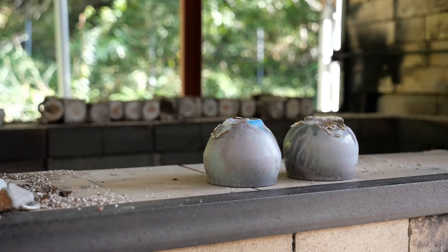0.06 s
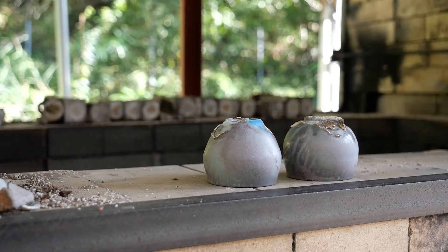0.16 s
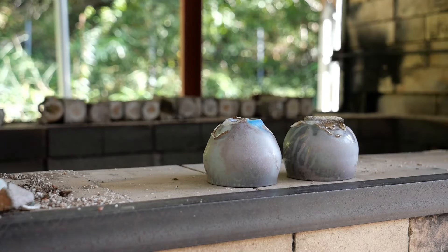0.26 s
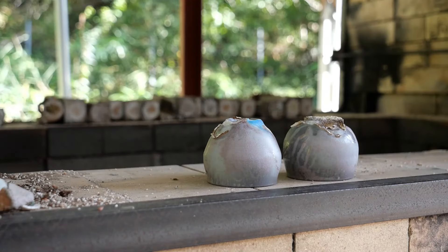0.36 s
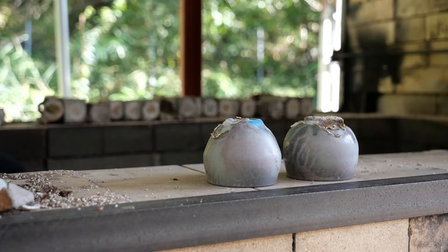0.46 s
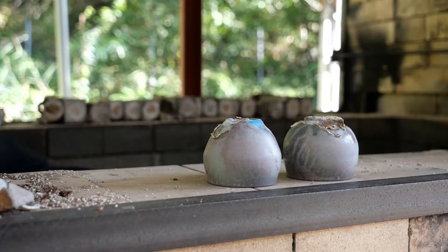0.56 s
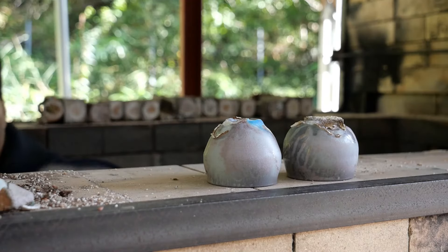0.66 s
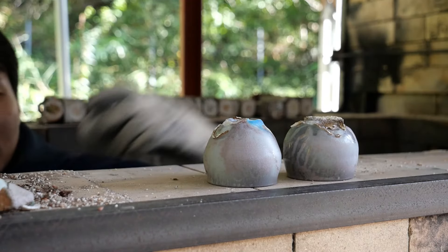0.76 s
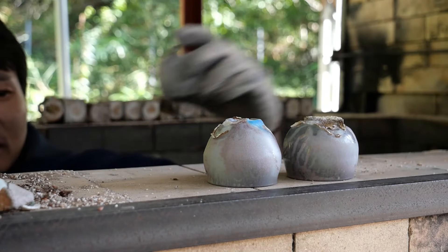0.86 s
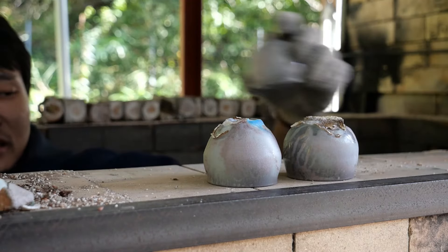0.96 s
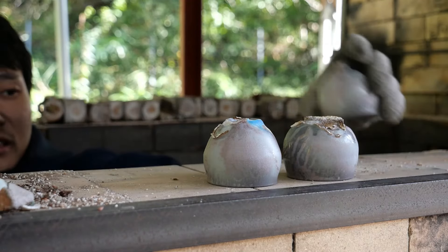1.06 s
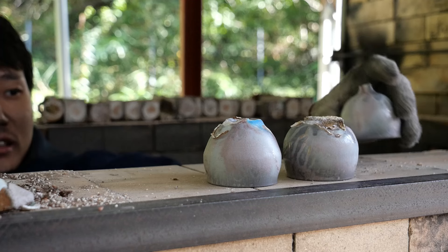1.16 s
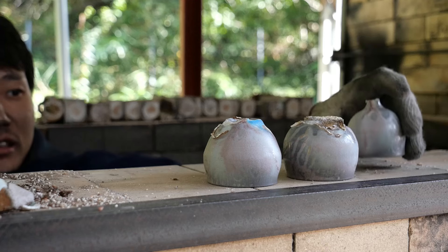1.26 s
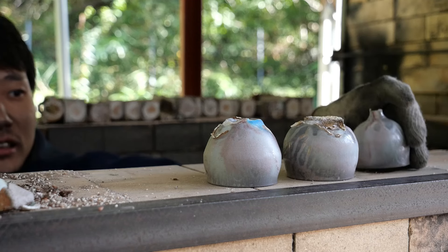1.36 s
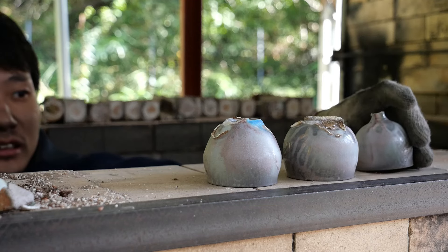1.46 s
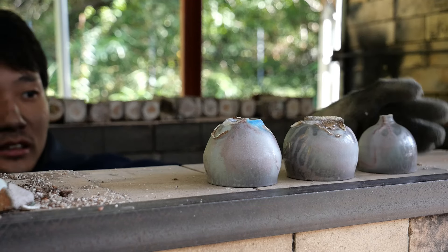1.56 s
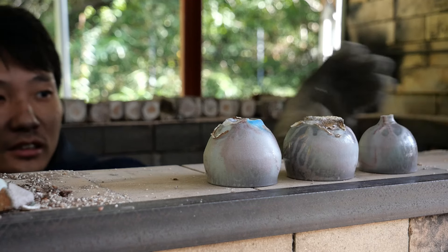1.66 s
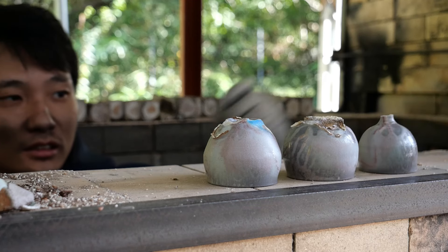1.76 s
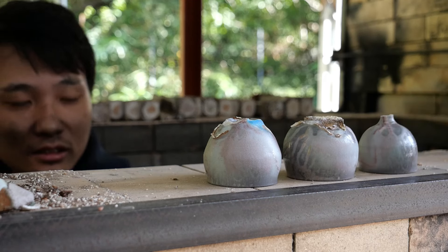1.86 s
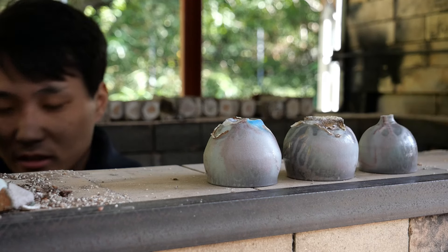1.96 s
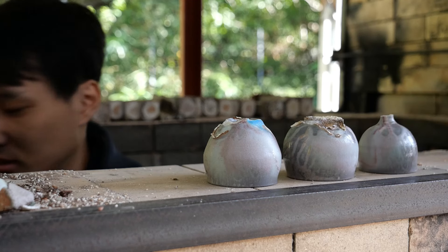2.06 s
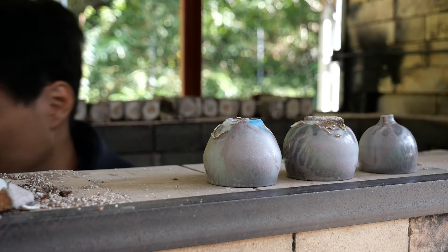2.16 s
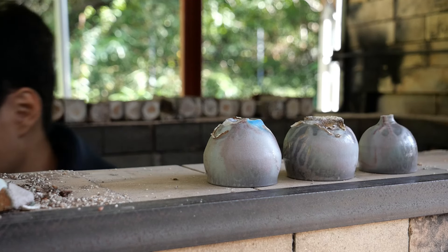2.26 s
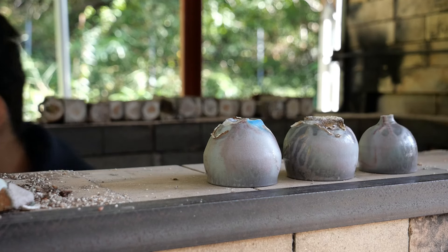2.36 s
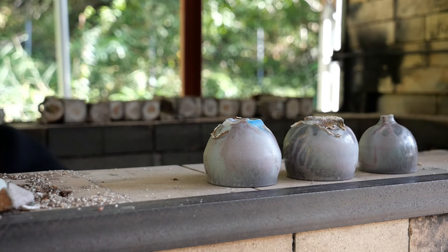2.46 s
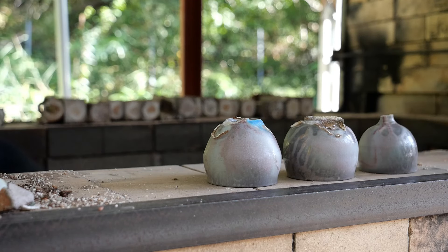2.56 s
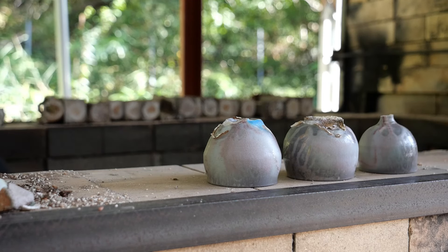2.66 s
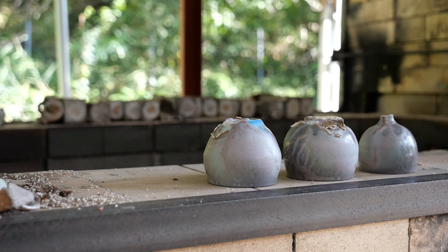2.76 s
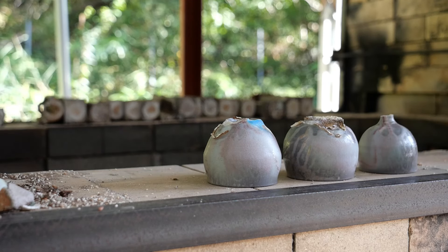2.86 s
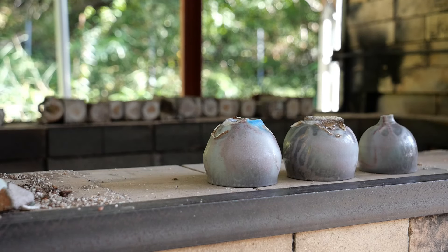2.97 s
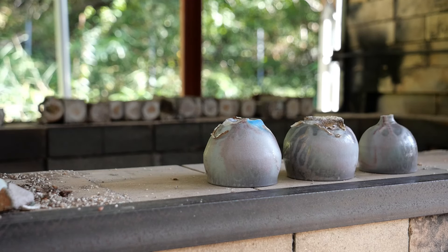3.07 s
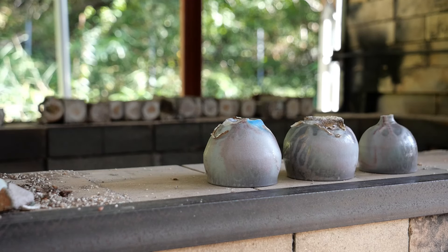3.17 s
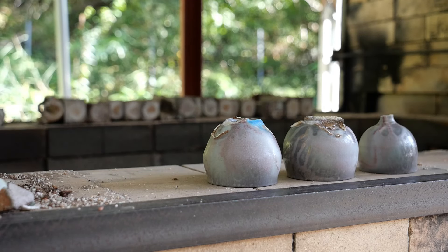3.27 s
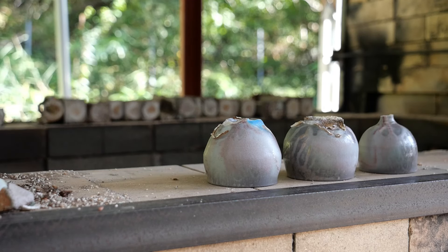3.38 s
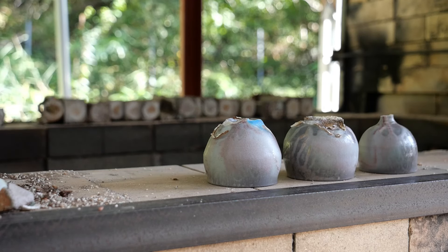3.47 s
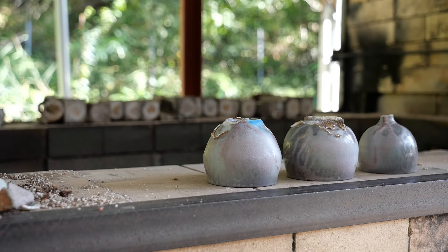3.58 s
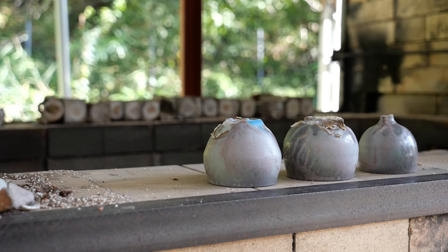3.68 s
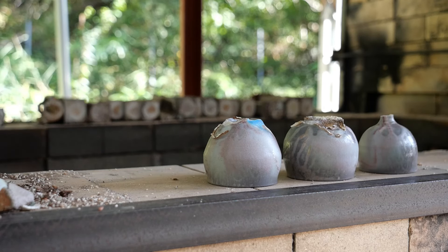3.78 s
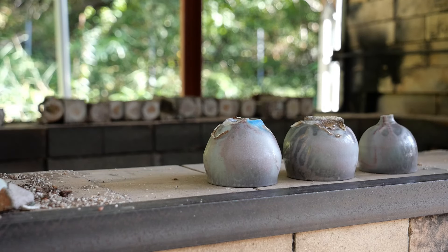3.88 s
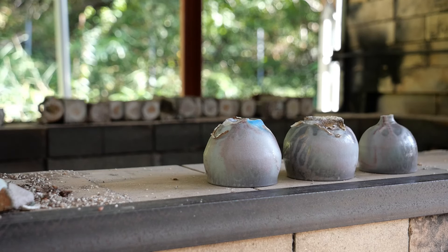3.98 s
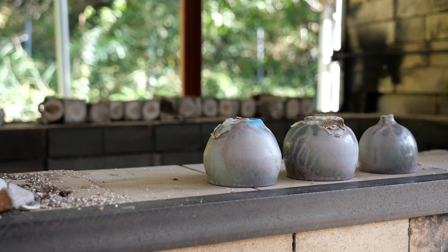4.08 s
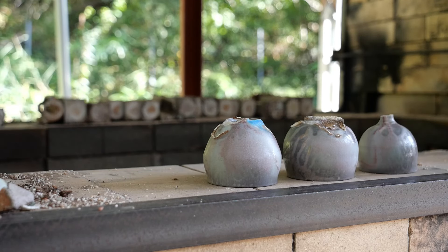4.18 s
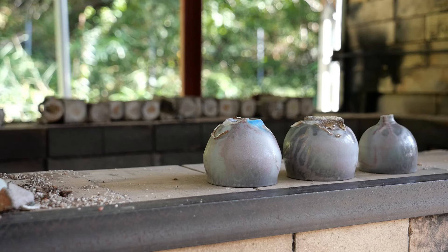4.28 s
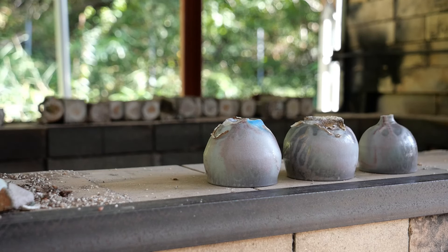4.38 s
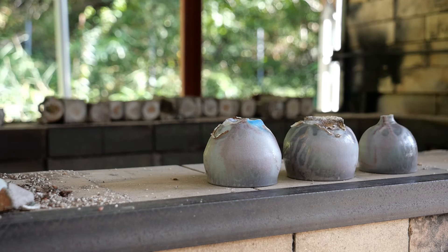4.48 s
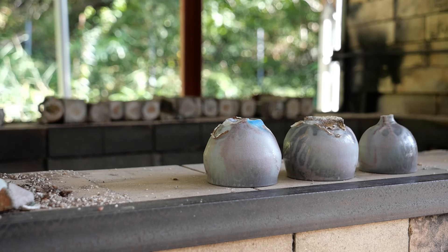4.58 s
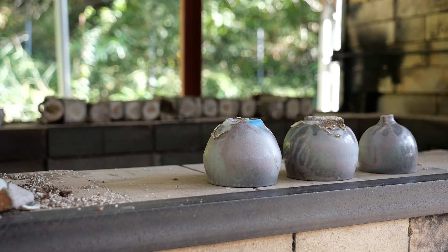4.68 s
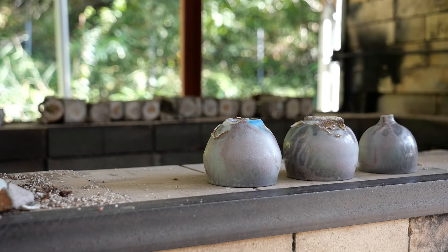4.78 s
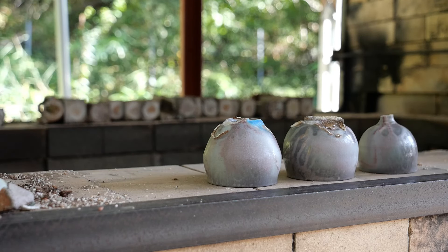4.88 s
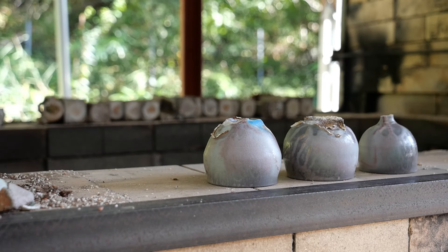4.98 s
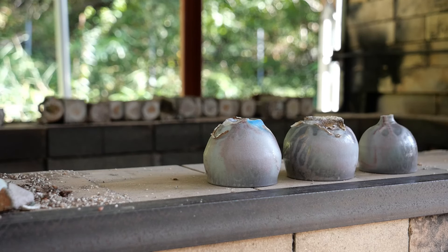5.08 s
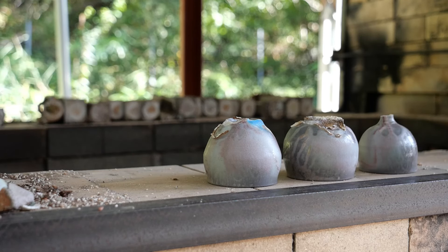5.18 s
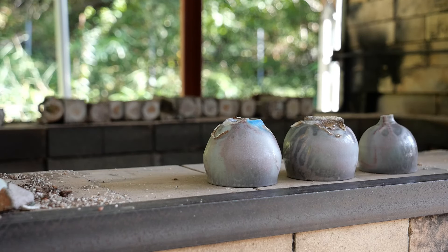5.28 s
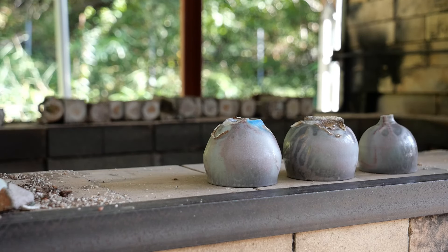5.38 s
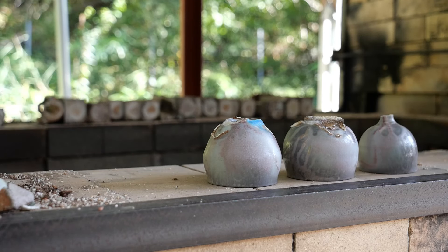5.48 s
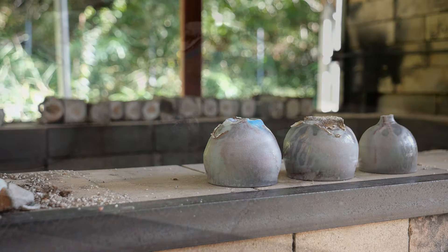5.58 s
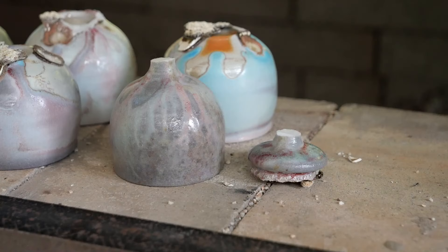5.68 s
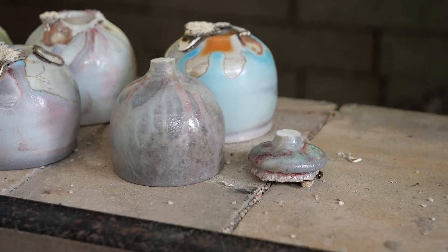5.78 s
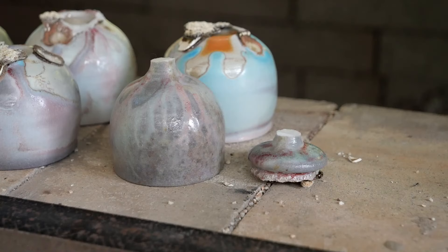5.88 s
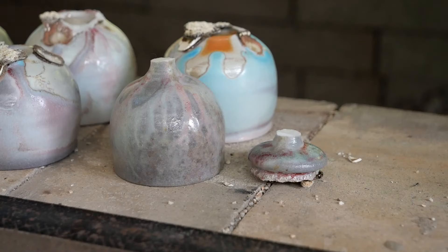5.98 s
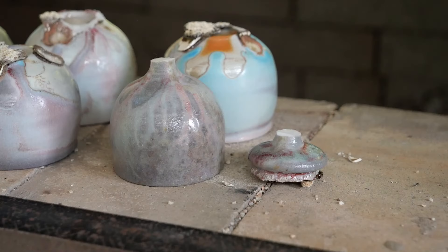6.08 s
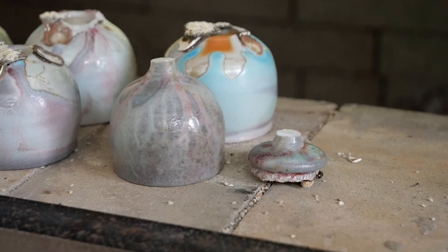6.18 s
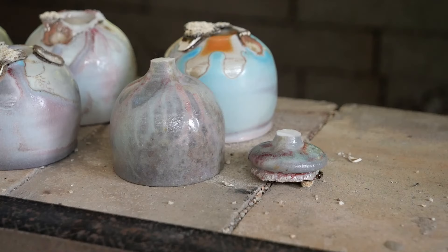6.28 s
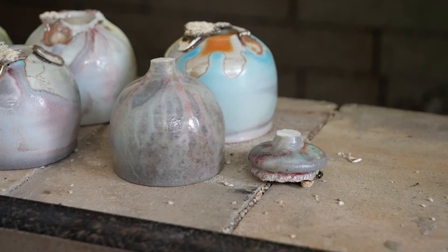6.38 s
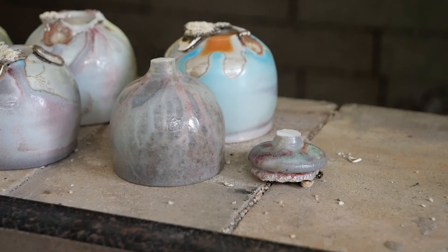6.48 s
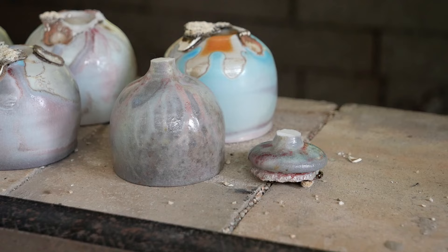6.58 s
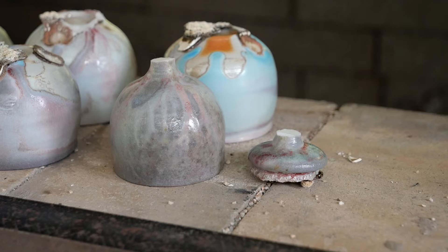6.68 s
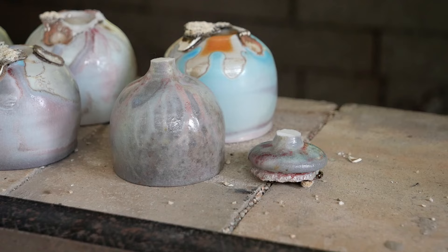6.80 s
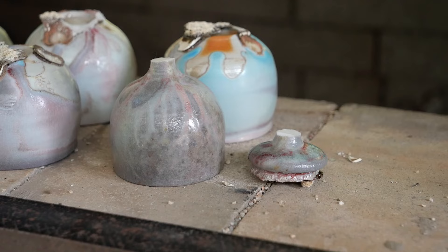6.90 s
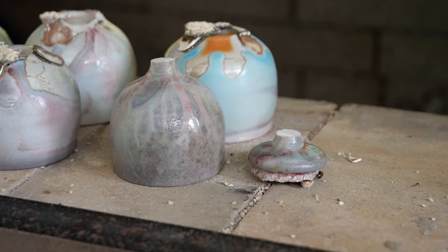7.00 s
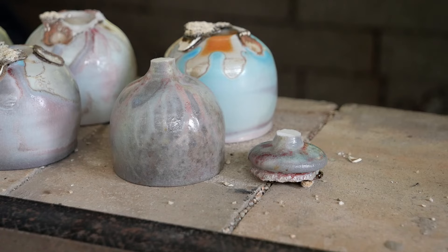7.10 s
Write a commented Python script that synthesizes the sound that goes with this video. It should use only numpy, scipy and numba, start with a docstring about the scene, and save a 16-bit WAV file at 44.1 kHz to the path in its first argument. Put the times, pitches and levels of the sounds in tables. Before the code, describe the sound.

In an open shed, low wind booms, flutters and thumps on the stereo microphone, mostly harder on the left, over faint leaf hiss and insect chirps. A ceramic pot is set down with a light rattle and firm knock. Fine glassy ticks and pings follow from cooling glaze, with small gritty scrapes. The scene then cuts to a sheltered corner where the wind almost disappears and sparse pings and chirps remain.

```python
"""An open shed, close by a kiln shelf of freshly fired glazed pots, two microphone ports in the wind.
From the start eddies buffet the ports as booms, flutter and thumps, mostly harder on the left; banded scrapes
make insects chirp outside over a filtered-noise hiss. At 1.5 s a pot is set down: noise knocks and decaying modes.
From 2.1 s the glaze ticks (noise bursts) and the pots ring (decaying sines). At 5.6 s the place becomes
a sheltered corner with far less wind, where ticks, rings and chirps go on."""
import sys
import numpy as np
from scipy import signal
from scipy.fft import rfft, irfft
from scipy.io import wavfile
from scipy.ndimage import uniform_filter1d
from numba import njit

SR = 44100
rng = np.random.default_rng(int(sys.argv[2]) if len(sys.argv) > 2 else 0)


def to_wav(sig):
    """Store sig (one row per channel, or 1-D mono) as 16-bit WAV at the path in sys.argv[1].

    Samples outside -1..1 are clipped; the rate is SR.
    """
    pcm = np.clip(np.atleast_2d(sig), -1, 1) * 32767
    pcm = np.round(pcm).astype(np.int16)
    wavfile.write(sys.argv[1], SR, pcm.T)  # frames by channels


def undo_db(level):
    """Turn decibels back into plain size, where 20 dB means ten times bigger."""
    steps = np.asarray(level, float) / 20
    return 10 ** steps


N = 314874
CUT_S = 5.635  # the place changes from the windy shed to the sheltered corner
LEAD_S = 0.006  # brief quieter noise before each snap of a crack or knock


# glaze cracks on the shelf: (time [s], crack level before trim [dB], ring level [dB],
# tilt to high modes [dB per family step], ring length before stretch [s])
PINGS = [(2.144, -44, -51.5, -19.5, .42), (2.2054, -42, -52, -19.5, 0.13), (2.2902, -39.5, -60, -12, 0.25),
         (3.2273, -44, -46.5, 0.5, 0.052), (3.3817, -50.5, -60.5, -1, 0.15), (3.5359, -43, -44.5, -3, 0.1),
         (3.5654, -51, -50, 11, 0.077), (3.5742, -40, -60.5, 4, 0.16), (4.0887, -57, -70, -1.5, .12),
         (4.3413, -24, -42, 20.5, 0.083), (4.6553, -20, -31, 1, 0.077), (4.7334, -39.5, -45, -1, 0.063),
         (4.7735, -41, -53.5, -9, 0.045), (4.9256, -71, -69, -17, .14), (4.9915, -43.5, -47, -1, 0.42),
         (5.0501, -36.5, -38.5, -1.5, 0.1), (5.066, -36, -34.5, -3, .054), (5.2474, -45, -54, 0, 0.52),
         (5.3511, -34.5, -42, 1, 0.13), (5.4854, -47, -58.5, 0, 0.12), (5.5256, -41.5, -65.5, 0, 0.052),
         (5.5373, -52, -38.5, -1, 0.13), (5.5942, -46, -40, 1, 0.058), (5.705, -48, -46.5, 5, 0.54),
         (5.7787, -44, -59, 11.5, 0.39), (5.8224, -37.5, -43.5, -4.5, 0.2),
         (6.0462, -42.5, -51.5, -14, 0.054), (6.0829, -26, -26.5, -2.5, .12),
         (7.002, -42, -62.5, -10, 0.075)]
# modes of the ringing pot: (frequency [Hz])
POT_HZ = [1642, 3303, 3558, 4058, 5943, 7247, 7914, 8978, 11903, 12163, 13800]
# the same modes: (family from 0 low to 2 high, relative level [dB], t60 [s])
POT = [(0, -21.5, 0.21), (0, -18, 0.37), (0, -3.5, 0.51), (0, -6, 0.78), (1, -2, 0.21), (1, -0.5, 0.82),
       (1.6, -11, 0.57), (1, -31.5, 1), (1.7, -33.5, 0.69), (1.5, -32, 0.69), (2, -40.5, 0.56)]


def glaze_pings():
    """Each crack of the glaze strikes the pot and leans toward its low or its high modes."""
    out = np.zeros((2, N))
    for s, crack_db, ring_db, tilt_db, length in PINGS:
        top_hz = 10200 + 176 * (crack_db + 21)  # weaker cracks are duller
        tick = crack(crack_db - 1, tick_t60=0.029, tail_t60=0.17, tail_db=-5.5, lead_db=-6.5, top_hz=top_hz)
        add(out, s - LEAD_S, tick)
        for hz, (family, db, t60) in zip(POT_HZ, POT):
            stretch = 1.4 if hz > 8500 else 1  # the highest modes are muffled later
            add(out, s, ring(hz, db + ring_db + tilt_db * (family - 1), t60, length * stretch))
    return out


# extra single rings, short or long, many starting with a crack:
# (time [s], frequency [Hz], level before trim [dB], length [s])
SINGLE_RINGS = [(2.144, 1640, -27, 0.12), (2.126, 7914, -42.5, 0.26), (2.132, 11903, -57.5, 0.26),
                (2.15, 5943, -50, 0.44), (2.197, 3305, -38, 1.07), (2.216, 4958, -49.5, 0.12),
                (2.207, 4058, -32, .4), (2.135, 8978, -71, .4), (3.228, 5943, -38.5, 0.076),
                (3.54, 8978, -58, 0.1), (3.54, 1720, -49, 0.11), (4.657, 5943, -25.5, 0.073),
                (4.657, 8978, -57, 0.14), (4.772, 4790, -45, 0.066), (5.35, 1642, -44, 0.066),
                (4.936, 5943, -42.5, 0.24), (5.058, 4070, -32, 0.096), (5.049, 1652, -46, .12),
                (5.351, 4040, -32.5, 0.044), (5.6, 1645, -38, 0.037), (5.638, 2624, -50, 0.45),
                (5.638, 8978, -61, 0.43), (5.771, 4058, -44, 0.19), (6.059, 4058, -58, 0.13),
                (6.081, 7930, -40, .31), (6.094, 3320, -61.5, .58)]


def single_rings():
    """Extra single modes, short or long, many starting with a crack: a quick swell, then a slight waver."""
    out = np.zeros((2, N))
    for s, hz, db, length in SINGLE_RINGS:
        add(out, s, ring(hz, db - 2.5, 4.3, length, rise=0.037 * length, waver_db=1.2, waver_s=0.07))
    return out


# contacts of a pot set on the shelf, rocking:
# (time [s], knock level [dB], ring level [dB], ring length before stretch [s])
SET_DOWN = [(1.482, -41.5, -27, 0.011), (1.487, -45, -38, 0.022), (1.518, -51, -44, .02),
            (1.542, -48, -34.5, 0.041), (1.554, -47, -32.5, 0.11), (1.6185, -19.5, -4, 0.0016),
            (1.6209, -4.5, -5.5, 0.034), (1.657, -49, -33.5, 0.055), (1.68, -39, -32, 0.032),
            (1.71, -61, -49, 0.076)]
# modes of that pot and the shelf: (frequency [Hz])
SET_POT_HZ = [800, 914, 1085, 2548, 3505, 5930, 10520, 11050]
# the same modes: (relative level [dB], t60 [s])
SET_POT = [(-30.5, 0.12), (-18, 0.04), (-26, .06), (-5, 0.19), (-28.5, 0.091), (-24.5, 0.99), (-45, 0.18),
           (-57, 0.28)]


def set_down():
    """Light touches chatter, bend the pitch and favour shelf and rim; the firm one wavers and bends least."""
    out = np.zeros((2, N))
    for s, knock_db, ring_db, length in SET_DOWN:
        knock = crack(knock_db, tick_t60=0.0042, tail_t60=0.15, tail_db=-22, lead_db=-33, top_hz=5100)
        add(out, s - LEAD_S, knock)
        chatter_db = np.clip(-0.22 * ring_db + 0.5, 0, 6)
        for hz, (db, t60) in zip(SET_POT_HZ, SET_POT):
            favour_db = 1.3 * chatter_db * (hz < 1500 or hz > 9000)
            # the foot stops the lowest ring first
            mode = ring(hz, db + ring_db + favour_db, t60, length * (1 + hz / 5000),
                        rise=0.00032 + 0.00055 * chatter_db, waver_db=chatter_db, waver_s=0.005,
                        bend=0.0025 * chatter_db)
            add(out, s, mode)
    return out


def ring(hz, db, t60, length, rise=0.0013, waver_db=4.0, waver_s=0.02, bend=0.0):
    """One mode: it wavers as the pot rocks, the shelf muffles it, and a faint rest dies more slowly."""
    t = np.arange(int(max(length, 0.005) * 3 * SR)) / SR
    done = t / t[-1]
    muffle = np.cos(np.pi / 2 * np.minimum(3 * done, 1)) + 0.1 * (1 - done) ** 2
    attack = 1 - np.exp(-t / max(rise, 1e-4))
    shape = attack * muffle * np.exp(-np.log(1000) * t / t60)
    waver = np.interp(t, np.arange(90) * waver_s, rng.standard_normal(90))
    tone = np.sin(2 * np.pi * hz * (t + bend * np.cumsum(waver) / SR))
    return np.sqrt(2) * undo_db(db) * undo_db(waver_db * waver) * shape / shape.max() * tone


# colour of a crack or knock: (frequency [Hz], relative level per Hz [dB])
CRACK = [(290, -50), (500, -8.5), (917, -11), (1230, -6.5), (2880, -6), (3520, -1.5), (4550, -7.5),
         (6820, -13), (7390, -6), (12500, -36.5), (16200, -74.5), (22000, -120)]


def crack(db, tick_t60, tail_t60, tail_db, lead_db, top_hz):
    """Brief quieter noise, a snap, and the wash of the shed, which differs a little left and right."""
    t = np.arange(SR // 5) / SR - LEAD_S
    mid, side = (unit(colour(rng.standard_normal(len(t)), CRACK)) for _ in range(2))
    tail = undo_db(tail_db) * np.exp(-np.log(1000) * t / tail_t60) * (t > 0)
    snap = np.exp(-np.log(1000) * t / tick_t60)
    shape = np.where(t < 0, undo_db(lead_db), snap + tail)
    stereo = mid * shape + 0.3 * side * tail * np.array([[1], [-1]])
    return undo_db(db) * band(stereo, 310, top_hz, order=4)


# gritty scrapes under a foot ring: (time [s], length [s], level before fade [dB], low edge [Hz], high edge [Hz])
GRIT = [(1.28, 0.045, -51, 1005, 3493), (1.487, 0.03, -49, 780, 1300), (1.54, 0.12, -47, 800, 5000),
        (1.617, 0.074, -37.5, 632, 1300), (2.033, 0.091, -60, 3080, 6000), (2.13, 0.059, -35, 680, 4000),
        (2.2, .03, -38.5, 900, 3000), (2.267, 0.05, -44.5, 900, 4500), (3.538, 0.11, -48, 1110, 4500),
        (3.964, 0.0053, -48.5, 800, 4970), (4.773, 0.024, -38, 3500, 5060),
        (4.918, 0.31, -50.5, 1190, 5948), (5.534, 0.22, -45.5, 690, 2968), (5.711, 0.068, -48.5, 980, 1493),
        (5.799, 0.032, -56, 1000, 4951), (7.004, 0.058, -44, 1600, 3580)]


def grit():
    """Grains of sand crunch under a foot ring: dense small ticks in a band, fading out."""
    out = np.zeros(N)
    for s, length, db, lo_hz, hi_hz in GRIT:
        n = int(length * SR)
        ticks = (rng.random(n) < 330 / SR) * rng.standard_normal(n)  # 330 per second
        ticks = ticks + 0.03 * rng.standard_normal(n)
        fade = np.sqrt(np.linspace(1, 0, n))
        add(out, s, undo_db(db) * fade * unit(band(ticks, lo_hz, hi_hz, order=4)))
    return out


# wind on the left port: (time [s], gust level before trim [dB], centre pitch of the buffet [Hz])
LEFT_GUST = [(0, -15.5, 171), (.06, -52, 145), (.13, -25, 159), (.3, -26, 172), (.43, -34.5, 223),
             (.66, -30, 180), (.92, -46, 200), (1.04, -31, 210), (1.54, -37.5, 160), (1.66, -37, 150),
             (1.73, -20.5, 210), (1.93, -19, 210), (2.59, -24, 228), (3.5, -22, 233), (3.709, -23, 298),
             (3.78, -28.5, 140), (3.971, -29, 137.8), (4.1, -30, 140), (4.17, -26.5, 230),
             (4.31, -23, 199.3), (4.58, -40, 241), (4.8, -29.5, 240), (5.1, -28.5, 240), (5.2, -25, 210),
             (5.63, -32, 254), (5.64, -65, 160), (5.84, -53, 166), (6.02, -54.5, 170), (6.09, -36, 180),
             (6.17, -53, 205), (6.331, -54.5, 212), (6.4, -101.5, 148.7), (6.9, -81.5, 273),
             (7.14, -88, 250)]
# wind on the right port, same columns: (time [s], gust level before trim [dB], centre pitch [Hz])
RIGHT_GUST = [(0, -43, 170), (.21, -52, 150), (.3, -29, 100), (.66, -30, 150), (.9, -37.5, 120),
              (1.03, -27.5, 130), (1.34, -33, 120), (1.599, -29.5, 130), (1.7, -39.5, 120),
              (1.92, -29, 110), (2.1, -37, 150), (2.55, -35.5, 170), (2.64, -24.5, 140), (3, -28, 122.4),
              (3.23, -32, 130), (3.5, -28.5, 133.8), (3.62, -41, 199), (3.85, -44.5, 240),
              (3.93, -29.5, 250), (4.15, -38, 225.5), (4.43, -48.5, 170), (4.55, -32, 170), (4.7, -58, 150),
              (5.05, -36, 140), (5.15, -27, 120), (5.35, -35, 120), (5.55, -29.5, 129), (5.631, -32, 130),
              (5.638, -87, 140), (6, -90, 230), (6.1, -65, 290), (6.4, -102, 279.7), (7.14, -100, 250)]


def wind():
    """Eddies kick each microphone port, partly both: boom, flutter and single thumps."""
    left = eddies(rate=260, spread_db=1.0, bed=0.4)
    right = eddies(rate=380, spread_db=2.5, bed=0.46)
    shared = 0.55 * unit(left) + 0.75 * unit(right)
    boom = np.array([buffet(left, LEFT_GUST), buffet(shared, RIGHT_GUST)])
    # each boom leaks to the other port: right to left, then left to right
    boom = boom + undo_db([[-9.5], [-19.5]]) * boom[::-1]
    on_left, on_right = flutter_gain(LEFT_GUST), flutter_gain(RIGHT_GUST)
    flutter = unit(band(np.array([left, right - 0.67 * left]), 402, 710))
    flutter = flutter * np.array([on_left, on_right + undo_db(-8) * on_left])
    return boom + flutter + thumps()


# single buffets, strong and weak: (time [s], level before trim [dB], pitch [Hz], left minus right [dB])
THUMPS = [(0.129, -18.5, 128, 14), (0.264, -17, 185, 12), (.632, -9, 146, -6), (.695, -13.5, 159, -8),
          (1.033, -13, 140, -11), (1.108, -17, 176, 4), (1.73, -10, 201, 21), (1.748, -17, 251, 21.5),
          (1.92, -17.5, 248, 25), (1.939, -12, 197, 21), (2.03, -19, 251, 27), (2.094, -15, 225, 21),
          (2.39, -14, 213, 4), (2.474, -18.5, 231, 22.5), (2.511, -15, 230, 18), (2.771, -18, 122, 11),
          (2.845, -16.5, 222, 27), (3.106, -12.5, 178, 8.5), (3.263, -16.5, 183, 22), (3.297, -11, 221, 9),
          (3.464, -10, 212, 6), (3.595, -23, 275, 31), (3.716, -23.5, 210.7, 27.5), (3.903, -22, 236, 25),
          (3.963, -15, 164, 24.5), (4.137, -25.5, 126, 34.5), (4.187, -33, 286, 38.5),
          (4.289, -13.5, 135, 11), (4.493, -17.5, 196, 9), (4.795, -14, 224, 16), (5.175, -17, 210, 28),
          (5.199, -15, 174, 11), (5.3, -17.5, 196, 15), (5.449, -13.5, 197, 10)]


def thumps():
    """A single buffet is one short pressure swing; the diaphragm snaps at the bottom of it."""
    out = np.zeros((2, N))
    t = np.arange(-int(0.00867 * SR), int(0.016 * SR)) / SR
    snap = np.sin(2 * np.pi * 750 * t) * np.exp(-np.abs(t) / 0.0005)
    for s, db, hz, pan_db in THUMPS:
        thump = -np.cos(2 * np.pi * hz * t) * np.exp(-(t * hz / 0.6) ** 2)
        thump -= thump.mean() * np.hanning(len(t)) * 2  # takes out the standing offset
        thump_db = db - 5.5 + np.array([[pan_db], [-pan_db]]) / 2
        # the more a thump leans left, the harder the snap; the exposed left port snaps harder
        snap_db = db - 50 + 0.97 * pan_db + np.array([[14.0], [9.0]])
        add(out, s - 0.004, thump * undo_db(thump_db) + snap * undo_db(snap_db))
    return out


def eddies(rate, spread_db, bed):
    """Random pressure kicks, a few far larger, over an even rush; only the rush is left in shelter."""
    kicks = (rng.random(N) < rate / SR) * rng.standard_normal(N)
    kicks = kicks * undo_db(spread_db * rng.exponential(size=N))
    rush = rng.standard_normal(N)
    return np.where(np.arange(N) < CUT_S * SR, unit(kicks) + bed * rush, rush)


def buffet(kicks, table):
    """A port booms at a wandering pitch, steeply cut above; the gust sets its quickly wavering level."""
    db, hz = curves(table)
    hz = hz * 2 ** (0.15 * walk(18))
    width = 0.96  # bandwidth over pitch
    boom = svf(kicks, hz, width)
    boom = svf(boom, 1.174 * hz, 1.3 * width)
    boom = svf(boom, 0.5 * hz, 1.86 * width)
    boom = svf(boom, 0.9 * hz, 1.8 * width)
    boom = band(boom, 65, 420)
    boom = boom / np.sqrt(uniform_filter1d(boom ** 2, size=SR // 4))  # evens the level over 0.25 s
    return boom * undo_db(db - 1 + 3 * walk(14))


def flutter_gain(table):
    """The harder and higher a gust, the more the port flutters."""
    gust_db, hz = curves(table)
    # -51 dB at a table level of -25.5 dB and 220 Hz; 9 dB more per octave
    return undo_db(-51 + 1.9 * (gust_db + 25.5) + 9 * np.log2(hz / 220))


# insect chirps outside: (time [s], length [s], level before swell [dB], starting pitch [Hz])
CHIRPS = [(.02, .1, -55.5, 3800), (.27, 0.11, -53.5, 3800), (.53, .27, -52.5, 3800), (.8, .14, -52.5, 4000),
          (.96, .21, -49, 3900), (1.26, .16, -47.5, 3950), (1.45, 0.45, -58.5, 4000),
          (1.76, .17, -59, 3800), (2.45, .39, -59, 3750), (2.95, .25, -60.5, 3800), (3.62, .3, -69.5, 3840),
          (3.99, 0.092, -67, 4000), (4.16, 0.12, -60.5, 4100), (4.42, .19, -60.5, 3950),
          (4.8, .1, -64, 3900), (6.2, .1, -59, 3800), (6.35, 0.25, -57, 3800), (6.58, .22, -54.5, 3800),
          (6.87, .12, -47.5, 4000)]
# a second, slower insect: (time [s], length [s], level before swell [dB], steady pitch [Hz])
SLOW_CHIRPS = [(6.295, 0.79, -67, 4800), (7.02, 0.11, -63, 4980)]


def insects():
    """Each chirp is a run of uneven, quickly dying scrapes on a narrow band, rising for the faster insect."""
    out = np.zeros(N)
    # scrapes per second, pitch rise over a chirp [Hz]
    for table, rate, rise_hz in (CHIRPS, 46, 200), (SLOW_CHIRPS, 19, 0):
        for s, length, db, hz in table:
            t = np.arange(int(length * SR)) / SR
            jitter = np.interp(t * rate, np.arange(40), rng.standard_normal(40))
            phase = np.cumsum(rate * (1 + 0.25 * jitter)) / SR % 1
            scrapes = uniform_filter1d(np.exp(-phase / rate / 0.011), size=90)
            noise = rng.standard_normal(len(t)) + 1j * rng.standard_normal(len(t))
            rough = signal.lfilter([1], np.poly([0.955, 0.955]), noise)  # narrow band about the carrier
            carrier = np.exp(2j * np.pi * np.cumsum(hz + rise_hz * t / length) / SR)
            swell = np.minimum(np.minimum(t / 0.037, (t[-1] - t) / 0.0043), 1)
            add(out, s, undo_db(db) * swell * unit(scrapes * np.real(rough * carrier)))
    return out


# background hiss level over time: a swell, a drop, a partial return; one list per place:
# (time [s], level before trim [dB])
AIR = [
    [(0, -64.5), (1.5, -60), (1.8, -71.5), (2.3, -64), (2.9, -70), (4.4, -73), (5, -66), (5.63, -63)],
    [(5.64, -65), (6.3, -66), (7.14, -64.5)],
]
# colour of the hiss: (frequency [Hz], relative level per Hz [dB])
HISS = [(290, -51.5), (500, -8), (573, -10.5), (1030, -11.5), (1120, -6.5), (1640, -6.5), (1930, -7.5),
        (2530, -6.5), (5660, -10.5), (6140, -10), (9900, -14.5), (13000, -35.5)]


def outdoors():
    """A distant hiss of leaves, wide in the lows; its treble follows the same level with a small random drift."""
    hiss_db, = curves(np.vstack(AIR))
    treble_db = hiss_db - 12.5 + walk(3)
    mid, side = (unit(colour(rng.standard_normal(N), HISS)) for _ in range(2))
    hiss = mid + 0.55 * band(side, 400, 6000, order=1) * np.array([[1], [-1]])
    hiss = band(hiss, 450, 13000)
    body = signal.sosfilt(signal.butter(1, 6000, fs=SR, output="sos"), hiss)
    return body * undo_db(hiss_db + 9.5) + (hiss - body) * undo_db(treble_db + 9.5)


def unit(x):
    """Scale to rms 1."""
    return x / np.sqrt(np.mean(x ** 2))


def curves(rows):
    """Columns of a table after its time column, drawn sample by sample."""
    s, *columns = np.transpose(rows)
    return [np.interp(np.arange(N) / SR, s, c) for c in columns]


def colour(x, points):
    """Filter by (frequency [Hz], level [dB]) points on a log frequency axis."""
    hz, db = np.transpose(points)
    f = np.arange(len(x) // 2 + 1) * SR / len(x) + 1
    return irfft(rfft(x) * undo_db(np.interp(np.log(f), np.log(hz), db)), len(x))


def band(x, lo_hz, hi_hz, order=2):
    """Butterworth band-pass."""
    return signal.sosfilt(signal.butter(order, [lo_hz, hi_hz], "band", fs=SR, output="sos"), x)


@njit
def svf(x, hz, width):
    """State-variable band-pass whose centre moves; gain 1 at the centre."""
    y, b, l = np.empty(len(x)), 0., 0.
    for i in range(len(x)):
        g = np.tan(np.pi * hz[i] / SR)
        v = (b + g * (x[i] - l)) / (1 + g * (g + width))
        b, l, y[i] = 2 * v - b, l + 2 * g * v, width * v
    return y


def walk(rate):
    """Slow random drift through `rate` normal draws a second."""
    return np.interp(np.arange(N) * rate / SR, np.arange(400), rng.standard_normal(400))


def add(out, s, sound):
    """Mix a sound in at time s; nothing rings across the change of place."""
    i = int(s * SR)
    stop = min(i + sound.shape[-1], int(CUT_S * SR) if s < CUT_S else N)
    out[..., i:stop] += sound[..., :stop - i]


def scene():
    """Pots, grit and insects in the middle, wind on the microphone ports, the outdoors behind."""
    near = glaze_pings() + single_rings() + set_down() + grit() + insects()
    # a wall to one side returns a weak echo, 2.7 ms late, that widens the picture
    echo = undo_db(-14) * np.roll(band(near[0], 800, 5000, order=1), int(0.0027 * SR))
    return near + echo * np.array([[1], [-1]]) + wind() + outdoors()


def band_limit(x):
    """A steep low-pass at the top of the band."""
    return signal.sosfilt(signal.butter(12, 15130, fs=SR, output="sos"), x)


def record(dry):
    """The recorder cuts the deepest bass, below 45 Hz."""
    mix = signal.sosfilt(signal.butter(2, 45, "high", fs=SR, output="sos"), dry)
    return band_limit(mix)


dry = scene()
out = record(dry)
to_wav(out)
```